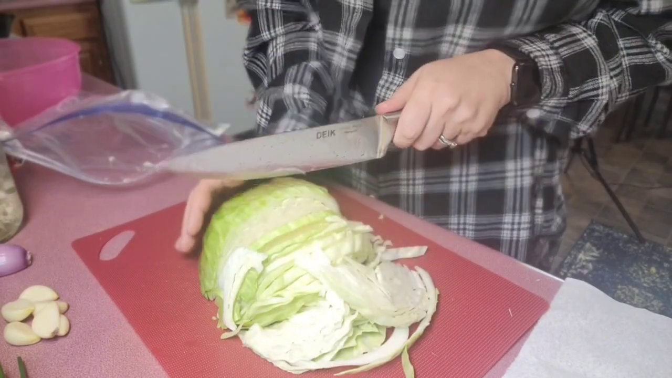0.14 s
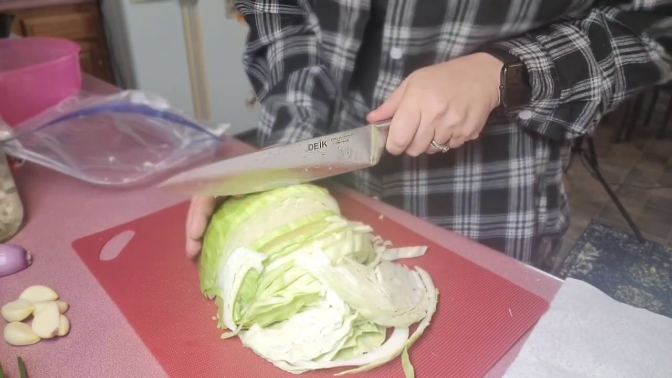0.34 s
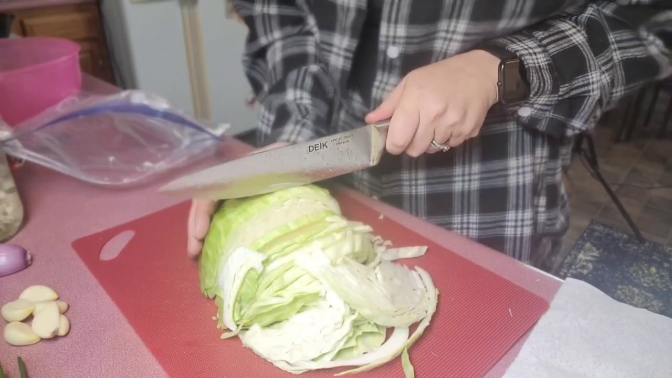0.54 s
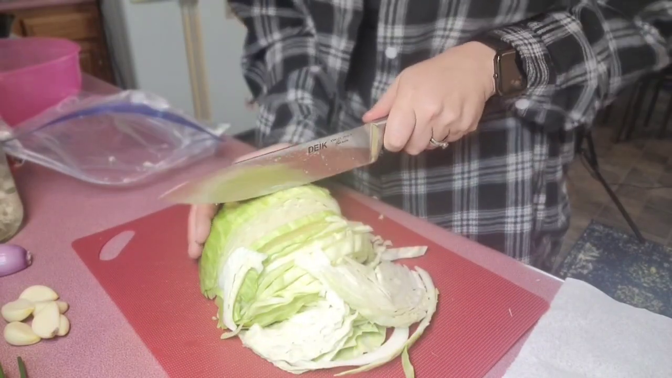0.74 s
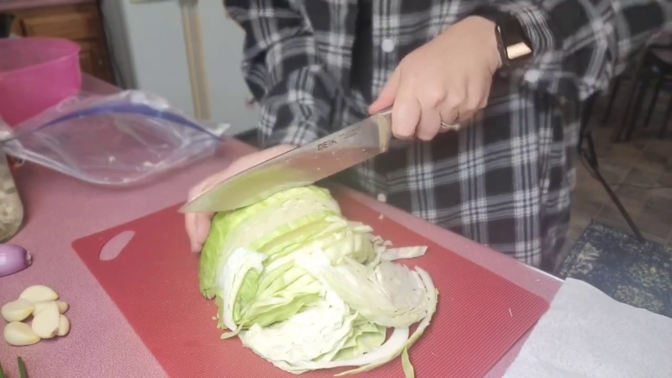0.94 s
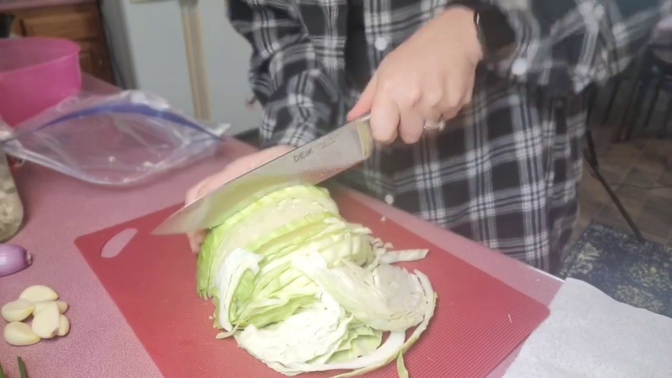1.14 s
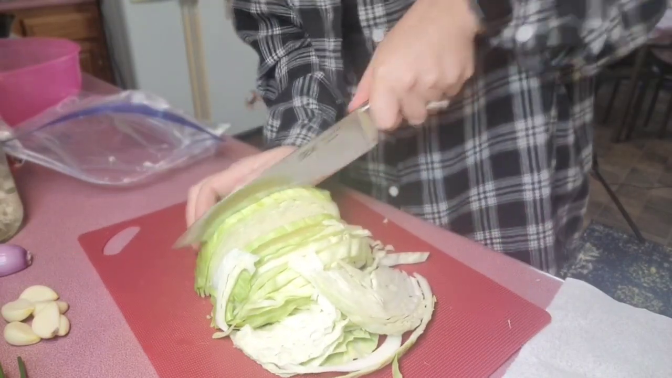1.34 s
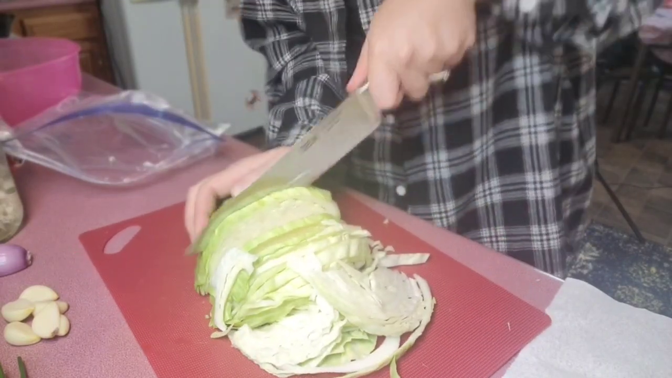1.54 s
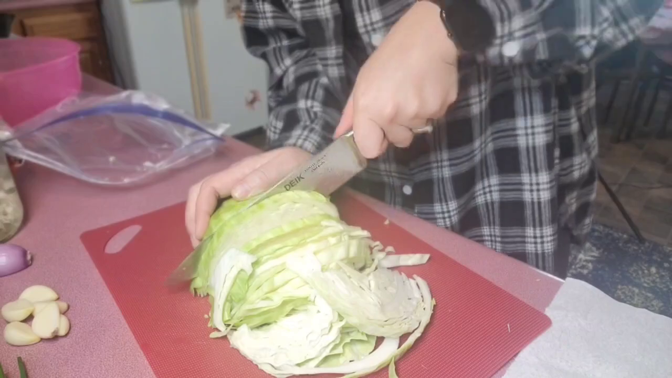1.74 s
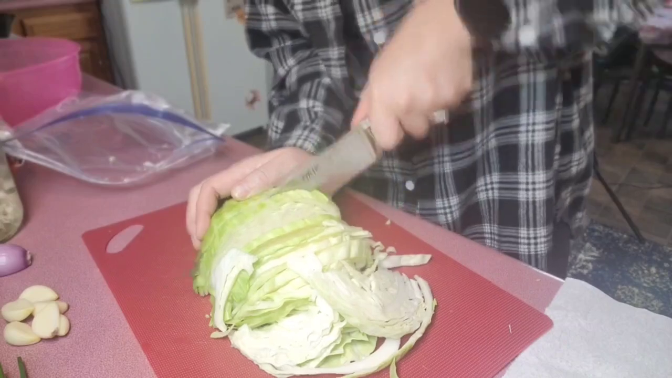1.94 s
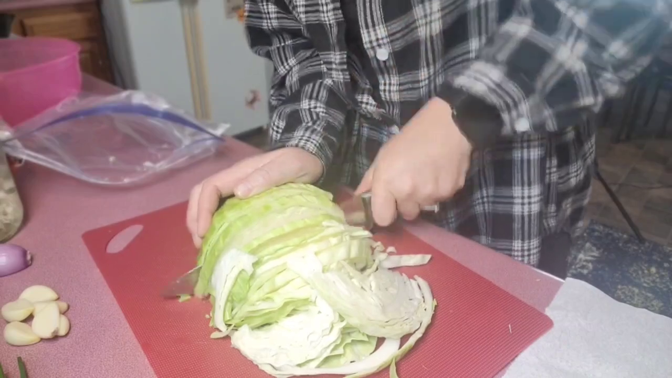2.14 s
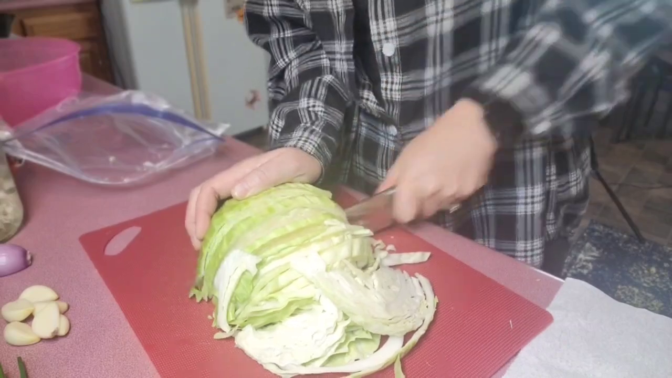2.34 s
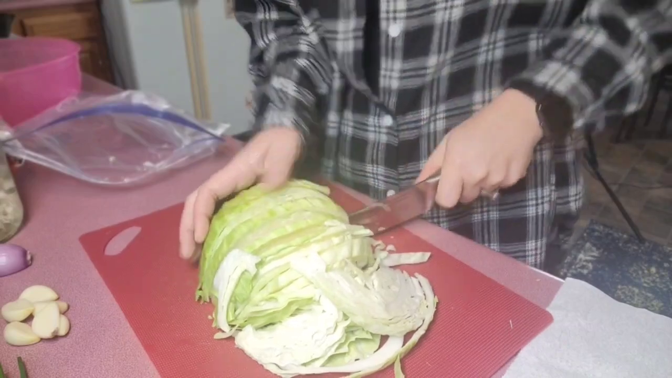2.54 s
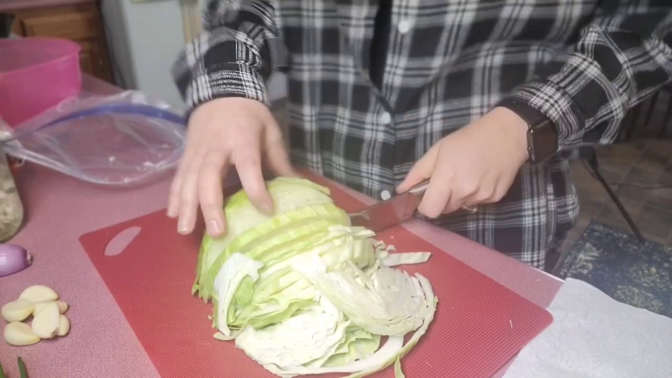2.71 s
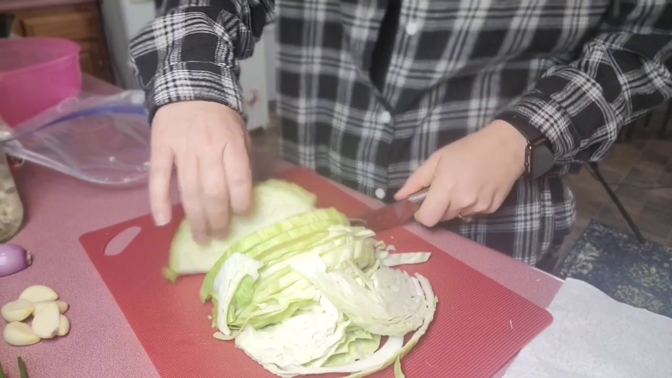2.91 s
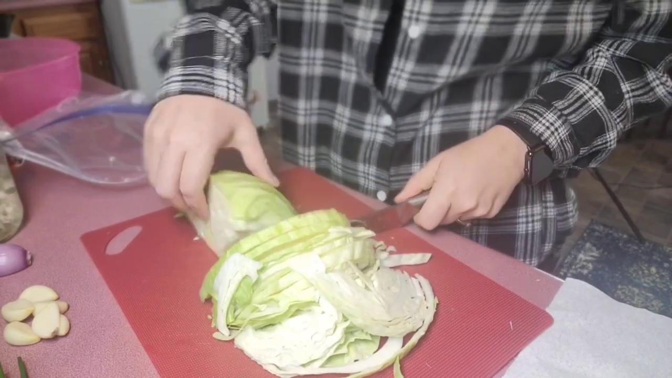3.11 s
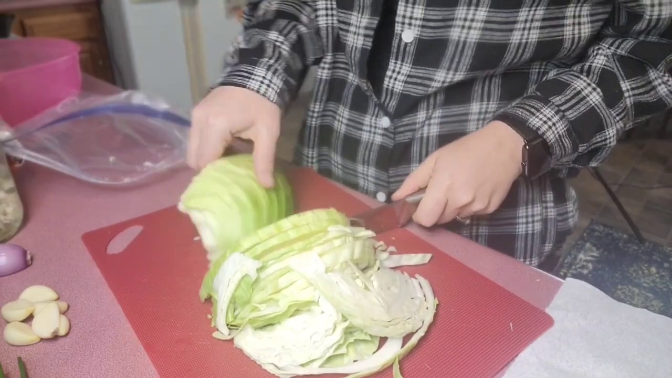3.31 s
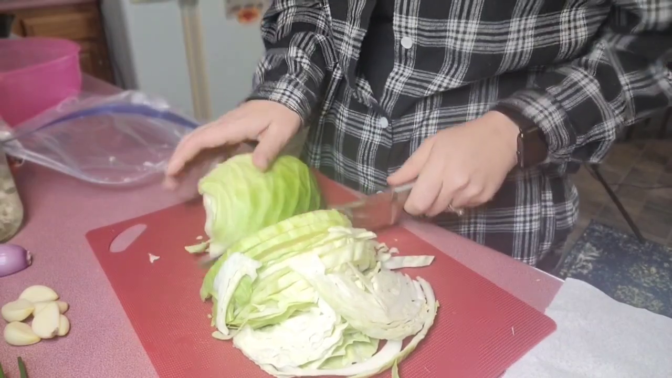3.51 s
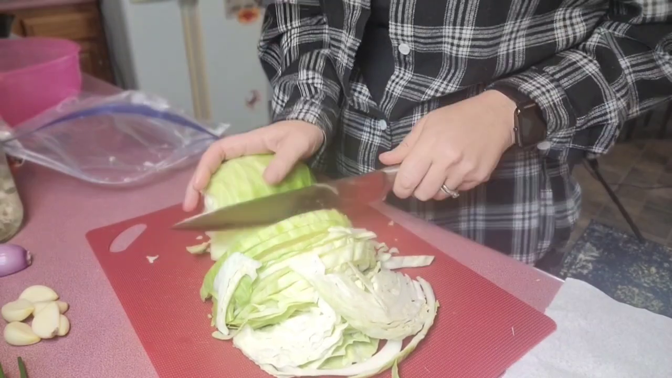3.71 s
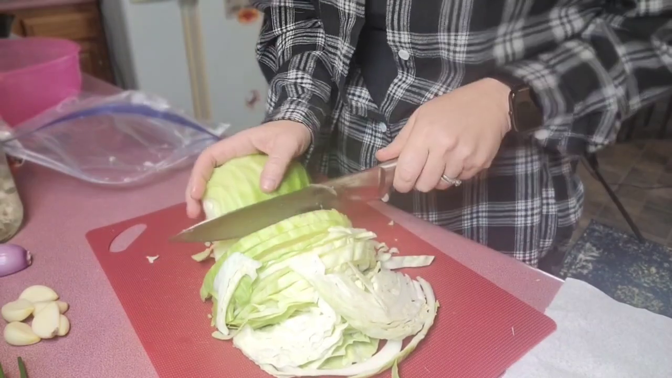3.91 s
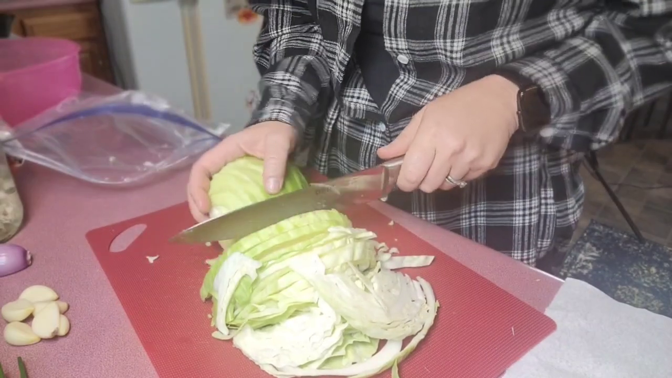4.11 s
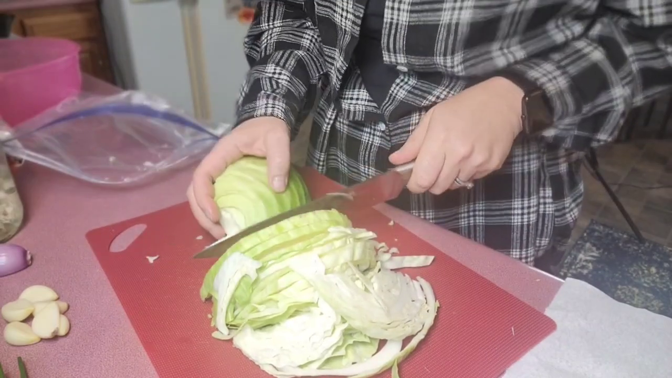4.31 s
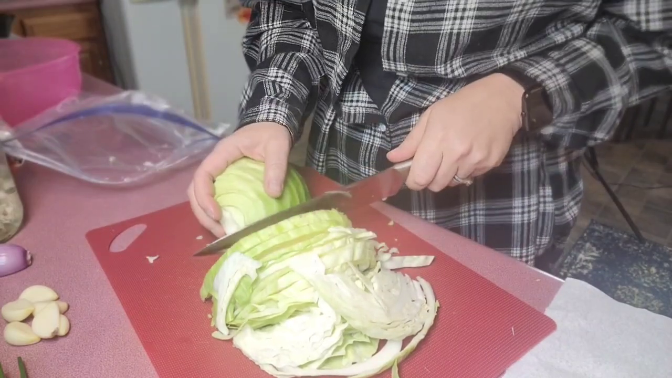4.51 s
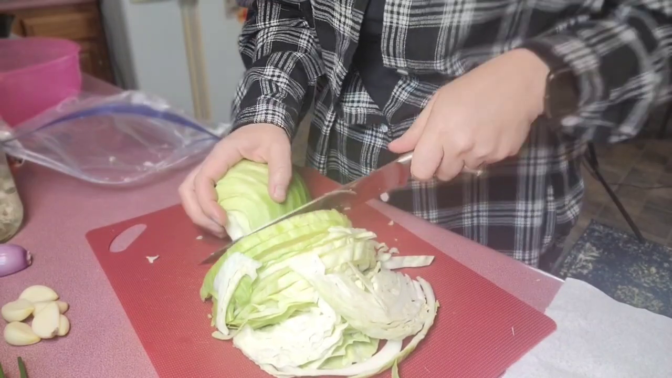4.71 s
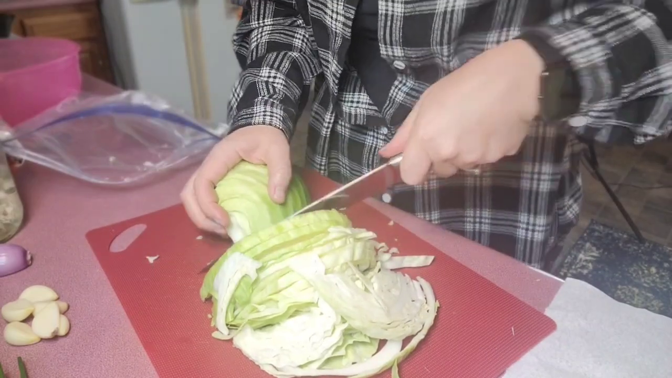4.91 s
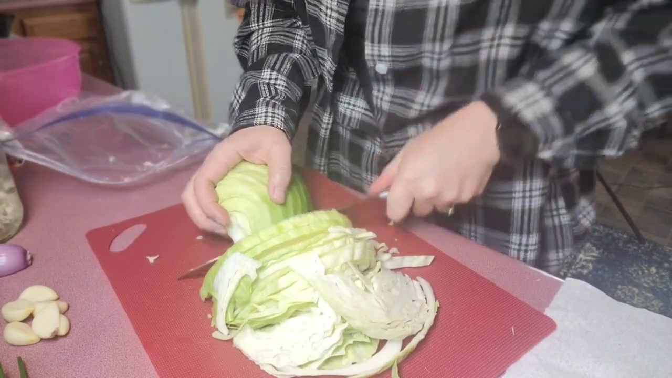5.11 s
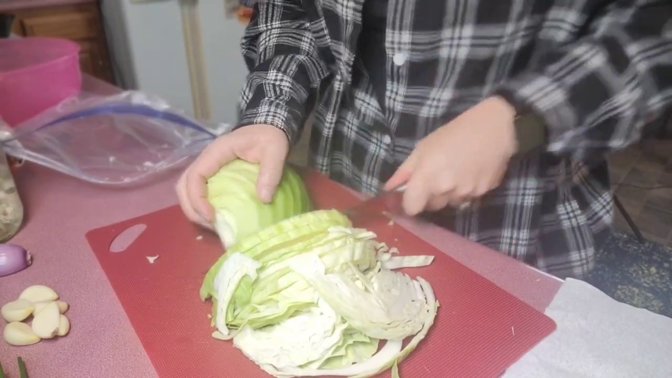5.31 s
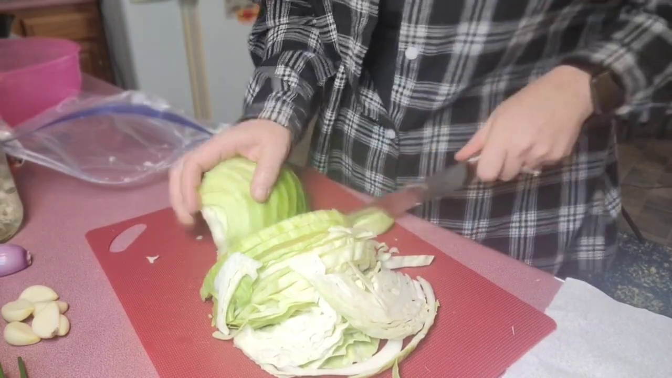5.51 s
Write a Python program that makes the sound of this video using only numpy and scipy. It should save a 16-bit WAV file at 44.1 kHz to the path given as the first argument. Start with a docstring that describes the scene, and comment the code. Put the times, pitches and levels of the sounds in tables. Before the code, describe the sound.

Cabbage being cut on a plastic board, heard very near, dry, slightly brighter on the right. Rhythmic wet crunches swell and pause, with rib snaps and tiny squeaks, until the blade hits the board hard. The head is then turned with soft papery crackle and thumps. After a near-silent gap comes one brief crisp cut, a duller knock, a short groan and a rising scrape.

```python
"""Kitchen counter: a chef's knife slices a cabbage on a plastic board in two cuts; a hand turns it between.
Crunch and rustle are random grains and wet pops shaped by effort curves; rib snaps and light blade touches
are noise bursts. Squeaks are jittered stick-slip tones; knocks and thumps ring the damped modes of board
and counter. Drags mix scrape with gliding chatter; the blade rings faintly.
Behind them: a short room tail, room noise and an appliance hum."""
import sys
import numpy as np
from scipy import signal
from scipy.fft import rfft, irfft
from scipy.io import wavfile
from scipy.ndimage import uniform_filter1d

SR = 44100
rng = np.random.default_rng(int(sys.argv[2]) if len(sys.argv) > 2 else 0)


def file_out(sig):
    """Save sig as 16-bit WAV at sys.argv[1]."""
    # one column per channel
    cols = np.atleast_2d(sig).T
    # limit, then scale
    lim = np.clip(cols, -1, 1)
    pcm = np.round(lim * 32767).astype(np.int16)
    wavfile.write(sys.argv[1], SR, pcm)


N = 244749
TIME = np.arange(N) / SR


def from_db(db):
    """Decibels to gain."""
    return 10 ** (np.asarray(db) / 20)


def rms_one(x):
    """Scale to unit rms."""
    return x / np.sqrt(np.mean(x ** 2) + 1e-20)


def at_hz(points, hz):
    """Read a table on a log-frequency axis."""
    table_hz, values = np.array(points).T
    return np.interp(np.log(hz + 1), np.log(table_hz), values)


def convolve(x, response):
    """Causal convolution along time."""
    return signal.fftconvolve(np.atleast_2d(x), np.atleast_2d(response), axes=-1)[:, :N]


def colour(x, spectrum, size=8192):
    """Minimum-phase filter of unit power with the given spectrum, falling away below its first point."""
    hz = np.arange(size // 2 + 1) * SR / size
    low_cut = np.minimum((hz + 1) / spectrum[0][0], 1) ** 2
    gain = from_db(at_hz(spectrum, hz)) * low_cut
    cepstrum = irfft(np.log(gain))
    response = irfft(np.exp(rfft(2 * cepstrum[:size // 2], size)))
    return convolve(x, response / np.linalg.norm(response))


def butter(x, hz, kind, order=2):
    """Butterworth low-, high- or band-pass."""
    return signal.sosfilt(signal.butter(order, hz, kind, fs=SR, output="sos"), x + 1e-18)


def drift(rate_hz):
    """Slow chance: straight lines between normal random knots."""
    knots = rng.standard_normal(N // 8)
    return np.interp(TIME * rate_hz, np.arange(len(knots)), knots)


def pulse(start_s, length_s):
    """A smooth contact force of unit area."""
    force = np.sin(np.pi * np.clip((TIME - start_s) / length_s, 0, 1)) ** 2
    return force / force.sum()


def ring(force, modes, struck=False):
    """Damped modes driven by a force: alternating-sign cosines, or sines in step if struck directly."""
    t = TIME[:SR // 2]
    swing = np.sin if struck else np.cos
    response = 0
    for k, (hz, db, t60_s) in enumerate(modes):
        sign = 1 if struck else (-1) ** k
        response = response + sign * from_db(db - 60 * t / t60_s) * swing(2 * np.pi * hz * t)
    return convolve(force, response)


def grains(per_s, spread_db):
    """Tiny fractures or slips at random moments and of uneven size; rms 1."""
    born = rng.random(N) < per_s / SR
    size = from_db(spread_db * np.minimum(rng.exponential(1, N), 4))
    clicks = born * size * rng.choice([-1, 1], N)
    local_power = uniform_filter1d(clicks ** 2, SR // 30)
    return rms_one(clicks / np.sqrt(local_power + 1e-3))


def bursts(events, decay_s):
    """Brittle breaks: each a crackle that dies at once, with the energy of one click."""
    t, out = TIME[:SR // 20], np.zeros(N + SR)
    for start_s, db in events:
        burst = rng.standard_normal(len(t)) * np.exp(-t / decay_s)
        out[int(start_s * SR):][:len(t)] += from_db(db) * burst / np.linalg.norm(burst)
    return out[:N]


RIGHT_LOUDER_DB, LEFT_LAG_S = 3.6, .00018   # treble lead of the right; delay of the left


def ports(x, scatter_db, scatter_s, lag_s=LEFT_LAG_S, split_hz=1000):
    """Two microphone ports: the left hears later; nearby surfaces scatter the treble differently into each."""
    t = TIME[:SR // 40]
    echoes = rng.standard_normal((2, len(t))) * np.exp(-t / scatter_s)
    echoes *= from_db(scatter_db) / np.linalg.norm(echoes, axis=1, keepdims=True)
    direct = 1.0 * (t == 0)
    bass = butter(direct, split_hz, "low", order=1)
    treble = direct - bass + butter(echoes, split_hz, "high")
    treble /= np.sqrt(1 + from_db(2 * scatter_db))
    balance = from_db([[-RIGHT_LOUDER_DB / 2], [RIGHT_LOUDER_DB / 2]])
    left, right = convolve(x, bass + treble * balance)
    return np.array([np.pad(left, round(lag_s * SR))[:N], right])


def patchy(x, depth_db, rate_hz):
    """Leaves of different stiffness give way in turn, so each half-octave swells on its own."""
    edges_hz = np.geomspace(1000, 11000, 8)
    band = np.digitize(np.arange(N // 2 + 1) * SR / N, edges_hz)
    spectrum, out = rfft(x), 0
    for k in range(len(edges_hz) + 1):
        out = out + irfft(spectrum * (band == k), N) * rms_one(from_db(depth_db * drift(rate_hz)))
    return out


def pops(cycles=12.0, spread_db=3.5):
    """Juicy cells burst one by one, each dying 60 dB in a few cycles at a pitch of its own; rms 1."""
    at, pitch, chance = rng.random((3, 2000 * N // SR, 1))
    t, hz = TIME[:SR // 150], 700 + 14500 * pitch
    level_db = -spread_db * np.log(chance + .02) - 60 * t * hz / cycles
    waves = np.sqrt(hz) * from_db(level_db) * np.sin(2 * np.pi * hz * t)
    where = (at * N).astype(int) + np.arange(len(t))
    return rms_one(np.bincount(where.ravel(), waves.ravel(), N)[:N])


def crackle(loudness, spectrum, per_s, spread_db, clump_db, wet=0, count=4):
    """Dry grains from several spots that take turns, each with its own path to the ports, and wet pops."""
    shares = from_db([10 * drift(rate_hz=14) for _ in range(count)])
    clumps = rms_one(from_db(clump_db * drift(rate_hz=180)))
    shares *= loudness * clumps / np.linalg.norm(shares, axis=0)
    out = sum(ports(share * grains(per_s, spread_db), scatter_db=5, scatter_s=.0028) for share in shares)
    if wet:   # power share of the pops
        juice = ports(loudness * pops(), scatter_db=-2, scatter_s=.003)
        out = np.sqrt(1 - wet) * out + np.sqrt(wet) * juice
    return colour(out, spectrum)


def gesture(start_s, rise_s, length_s, db, fade_db, release_s):
    """Gain of one movement: it builds up, fades or swells evenly while it lasts, then dies away."""
    t = TIME - start_s
    attack = np.sin(np.pi / 2 * np.clip(t / rise_s, 0, 1)) ** 2
    progress = np.clip((t - rise_s) / max(length_s - rise_s, 1e-3), 0, 1)
    release = np.exp(-np.maximum(t - length_s, 0) / release_s)
    return attack * from_db(db - fade_db * progress) * release + 1e-12


# room noise: (frequency [Hz], relative density [dB per Hz])
ROOM_NOISE_SPECTRUM = [(25, -14), (60, 1), (130, -20.5), (200, -10.5), (300, -21), (520, -23), (1340, -38),
                       (2500, -44.5), (6000, -47), (9500, -55), (15500, -57.5)]
# appliance hum: (frequency [Hz], rms level [dB])
HUM_TONES = [(59.2, -72), (118.4, -74.5), (193.8, -71.5), (349.9, -83), (457.6, -75)]
ROOM_NOISE_DB = -61.5


def background(apart_hz=700):
    """Room noise, more alike at both ports in the bass, and a slightly wavering appliance hum."""
    mid, side = colour(rng.standard_normal((2, N)), ROOM_NOISE_SPECTRUM)
    side = butter(side, apart_hz, "high") + from_db(-7.0) * side
    hum = 0
    for hz, db in HUM_TONES:
        phase = 2 * np.pi * hz * TIME + 0.28 * drift(rate_hz=1.7)
        hum = hum + from_db(db + 0.5 * drift(rate_hz=2.5)) * np.sqrt(2) * np.sin(phase)
    return from_db(ROOM_NOISE_DB) * (mid + side * np.array([[1], [-1]])) + hum


# kitchen reverberation: (frequency [Hz], t60 [s])
REVERB_T60 = [(100, 0.22), (700, .33), (4000, 0.17), (14000, 0.25)]


def kitchen(x):
    """A diffuse tail for each side, dying at its own rate in each band."""
    t, tail = TIME[:SR // 2], 0
    edges_hz = np.geomspace(60, 16000, 9)
    for low_hz, high_hz in zip(edges_hz, edges_hz[1:]):
        noise = butter(rng.standard_normal((2, len(t))), [low_hz, high_hz], "band")
        t60_s = at_hz(REVERB_T60, np.sqrt(low_hz * high_hz))
        tail = tail + noise * from_db(-60 * t / t60_s)
    tail = tail * np.clip((t - .004) / 0.00063, 0, 1)   # starts after 4 ms
    return convolve(x, tail / np.linalg.norm(tail, axis=1, keepdims=True))


# blade in the leaves: (start [s], length [s])
CUT_SPANS = [(0.914, 1.48), (4.91, 0.7)]
RUB_EDGE_S = 0.016   # coming and going


def in_cabbage():
    """About one while the blade is between the leaves, falling to zero outside."""
    return sum(gesture(start_s, RUB_EDGE_S, length_s, 0, 0, RUB_EDGE_S) for start_s, length_s in CUT_SPANS)


# hand steadies, turns and regrips the cabbage:
# (start [s], length [s], relative rustle level [dB], fade over the move [dB])
HAND_MOVEMENTS = [(2.565, 0.14, -62, -2.5), (2.77, 0.18, -63, 12), (2.947, 0.11, -58.5, -9.5),
                  (3.108, 0.39, -56, 1), (3.694, 0.154, -74.5, -4.5), (4.089, 0.17, -72.5, -9.5),
                  (4.717, 0.13, -72, 0.5)]
HAND_RISE_S, HAND_RELEASE_S = 0.037, 0.035


def hand_effort():
    """How hard the fingers bend the leaves."""
    return sum(gesture(start_s, HAND_RISE_S, length_s, db, fade_db, HAND_RELEASE_S)
               for start_s, length_s, db, fade_db in HAND_MOVEMENTS)


# hard pushes and lighter pulls of the blade in the leaves:
# (start [s], rise [s], length [s], relative crunch level [dB], fade over the stroke [dB],
#  relative counter rumble level [dB], relative first rib snap level [dB])
BLADE_STROKES = [(0.876, 0.011, 0.1, -59.5, 9, -49.5, -35), (0.949, 0.012, 0.063, -51.5, 13, -48.5, -48),
                 (1.046, 0.04, 0.14, -39.5, 11, -36.5, -36), (1.21, 0.052, 0.13, -53.5, 19.5, -79, -38),
                 (1.393, 0.035, .12, -36.5, 12, -32, -19), (1.552, 0.018, 0.1, -55.5, 13.5, -54.5, -77),
                 (1.699, 0.059, 0.14, -41.5, 3.5, -36.5, -33), (1.867, 0.087, 0.09, -54.5, 4.5, -50, -32.5),
                 (2.029, 0.035, 0.13, -39.5, -2.5, -34.5, -37), (2.153, 0.024, 0.037, -31, 0.5, -42, -44.5),
                 (2.2, 0.0091, 0.13, -52.5, 11, -51, -41), (4.898, 0.078, 0.11, -52, 5.5, -54.5, -38.5),
                 (5.011, 0.019, 0.027, -29.5, 7.5, -31.5, -34), (5.057, 0.035, 0.18, -50.5, -7.5, -49, -44)]
STROKE_RELEASE_S = 0.0097
PRESS_DB, PRESS_S = -26, 0.0066   # creak around each onset, relative to the stroke
RUB_DB = -70.5   # faint rub between strokes


def cutting_effort():
    """How hard the blade works through the leaves: it presses, bites, and rubs on until the next stroke."""
    effort = from_db(RUB_DB) * in_cabbage()
    for start_s, rise_s, length_s, db, fade_db, _, _ in BLADE_STROKES:
        press = from_db(db + PRESS_DB) * np.exp(-np.abs(TIME - start_s) / PRESS_S)
        effort = effort + press + gesture(start_s, rise_s, length_s, db, fade_db, STROKE_RELEASE_S)
    return effort


# soft pushes through the cabbage: (time [s], relative level [dB], contact [s])
SOFT_THUMPS = [(0.594, -20, 0.011), (0.959, -28.5, 0.0079), (1.414, -11.5, 0.013), (1.515, -23, 0.006),
               (1.845, -26, 0.0031), (2.763, -28, 0.014), (3.061, -22, 0.013), (3.191, -24.5, 0.011),
               (3.214, -25, 0.011)]
# counter under the board: (frequency [Hz], relative level [dB], t60 [s])
COUNTER_MODES = [(56.35, -10.5, 0.072), (96, -5.5, 0.13), (166, -10.5, 0.046), (159, 5, 0.074),
                 (212.5, -3.5, 0.096)]
# counter shake: (frequency [Hz], relative density [dB per Hz])
RUMBLE_SPECTRUM = [(25, -13), (55, -6), (90, 7), (125, -6), (175, 2.5), (240, -18.5), (400, -20),
                   (900, -58.5)]
SHAKE_RELEASE_S = 0.038
SHAKE_FOLLOWS = 0.63   # share of a stroke's fade that the rumble follows
RUB_SHAKE_DB, HAND_SHAKE_DB = -59, 3.5   # rubbing blade; hand, over its effort


def counter():
    """The uneven force of blade and hand shakes the counter, and sudden give thumps it."""
    shake = colour(rng.standard_normal(N), RUMBLE_SPECTRUM)
    shake /= np.sqrt(uniform_filter1d(shake ** 2, SR // 16) + 1e-6)   # even out the level
    force = from_db(RUB_SHAKE_DB) * in_cabbage() + from_db(HAND_SHAKE_DB) * hand_effort()
    for start_s, rise_s, length_s, _, fade_db, db, _ in BLADE_STROKES:
        force = force + gesture(start_s, rise_s, length_s, db, SHAKE_FOLLOWS * fade_db, SHAKE_RELEASE_S)
    push = sum(from_db(db) * pulse(start_s, contact_s) for start_s, db, contact_s in SOFT_THUMPS)
    return from_db(-2.5) * force * shake + ring(push, COUNTER_MODES)


# bending leaves: (frequency [Hz], relative density [dB per Hz])
RUSTLE_SPECTRUM = [(250, -3.5), (900, 4), (1600, 1), (3400, 9), (4400, 3), (7800, 6), (9000, -7),
                   (15500, -10.5)]


def handling():
    """Leaves bending under the fingers give a thinner, coarser, more clumped crackle."""
    rustle = crackle(hand_effort(), RUSTLE_SPECTRUM, per_s=1100, spread_db=3.6, clump_db=2.2, wet=.3)
    return from_db(.5) * patchy(rustle, depth_db=1.5, rate_hz=70)


# fingertip jerks on a taut leaf: (time [s], relative peak level [dB])
FINGER_TICKS = [(3.5316, -36), (3.5806, -46), (3.5862, -40), (3.5898, -39.5), (3.6103, -46)]
TICK_HZ, TICK_S = 3430, 0.00037


def ticks():
    """Each jerk of the fingertip flicks the leaf for a few cycles."""
    out = np.zeros(N)
    for time_s, db in FINGER_TICKS:
        t = TIME - time_s
        out += from_db(db) * np.exp(-(t / TICK_S) ** 2) * np.cos(2 * np.pi * TICK_HZ * t)
    return out


# wet leaf on steel or skin, squeak to groan:
# (start [s], length [s], relative level [dB], frequency [Hz])
LEAF_SQUEAKS = [(1.099, 0.0085, -43.5, 910), (1.139, 0.0087, -45.5, 950), (1.509, 0.0066, -43, 4520),
                (1.519, 0.0031, -40, 4440), (1.564, 0.008, -52.5, 5150), (1.837, 0.0093, -43, 4510),
                (2.271, 0.0038, -36, 3030), (2.327, 0.0048, -41.5, 3280), (4.83, 0.011, -65, 4630),
                (4.923, 0.0047, -50.5, 4300), (5.206, 0.046, -32, 171.5)]
GROAN_TOP_HZ = 1200   # slow slips have overtones up to here


def squeaks():
    """Stick and slip in uneven cycles; slow slips are more regular and carry overtones."""
    out = np.zeros(N)
    for start_s, length_s, db, hz in LEAF_SQUEAKS:
        t = TIME[:int(length_s * SR)]
        jitter = np.interp(t * hz, np.arange(80), rng.standard_normal(80))
        rough = .19 if hz > 500 else .06
        phase = 2 * np.pi * np.cumsum(hz * (1 + rough * jitter)) / SR
        overtones = max(int(GROAN_TOP_HZ / hz), 1)
        wave = sum(np.sin(k * phase) / k ** 2 for k in range(1, overtones + 1))
        out[int(start_s * SR):][:len(t)] += from_db(db + 4.5) * np.sqrt(np.sin(np.pi * t / length_s)) * wave
    return out


# flat of the blade along the leaves: (start [s], length [s], relative level [dB])
BLADE_SLIDES = [(1.21, 0.042, -64), (2.581, 0.17, -64.5), (4.092, 0.21, -85)]
# steel blade modes, damped by hand and leaves: frequency [Hz]
BLADE_MODES_HZ = [1403, 1937, 2164, 3110, 3320, 4180, 4470, 5113, 5307, 7360]
BLADE_T60_S, BLADE_SINGS_DB = 0.071, -10   # decay; gain on the cutting effort


def steel():
    """Fibres catching on the blade make it ring faintly at its own steady pitches."""
    sliding = sum(gesture(start_s, RUB_EDGE_S, length_s, db, 0, RUB_EDGE_S)
                  for start_s, length_s, db in BLADE_SLIDES)
    modes = [(hz, 0, BLADE_T60_S) for hz in BLADE_MODES_HZ]
    singing = rms_one(ring(grains(per_s=4000, spread_db=2.0), modes))
    return (sliding + from_db(BLADE_SINGS_DB) * cutting_effort()) * singing


# blade lands on the board:
# (time [s], relative crack level [dB], relative board level [dB], relative counter level [dB], contact [s])
BOARD_KNOCKS = [(2.1788, 7, -8.5, -20, 0.00012), (5.0321, -1.5, -17, -30, 0.00094)]
# board with the blade on it: (frequency [Hz], relative level [dB], t60 [s])
BOARD_MODES = [(208, 1, 0.048), (310, -4.5, 0.052), (392.2, -0.5, .06), (587.4, -11, 0.045),
               (914, -9, 0.066), (1218, -11.5, 0.065), (1290, -12, 0.042), (2255, -14, 0.081),
               (3360, -11.5, 0.037), (3700, -13.5, 0.05), (4610, -18.5, 0.061)]
# edge on plastic; board on counter: (frequency [Hz], relative density [dB per Hz])
CRACK_SPECTRUM = [(250, -6), (900, 1.5), (1700, -10), (2500, 0), (3600, 3.5), (5000, -3.5), (7200, 0.5),
                  (9500, -12.5), (15500, -25.5)]
SLAP_SPECTRUM = [(450, -4.5), (620, -0.5), (1000, -2), (1500, -7.5), (4000, -23.5)]


def knocks():
    """The edge cracks on the plastic, the board slaps on the counter, and both ring; long contact is duller."""
    cracks = [(time_s, db) for time_s, db, _, _, _ in BOARD_KNOCKS]
    slaps = [(time_s, db) for time_s, _, db, _, _ in BOARD_KNOCKS]
    crack = from_db(1.0) * colour(bursts(cracks, decay_s=0.0016), CRACK_SPECTRUM)
    slap = from_db(12.0) * colour(bursts(slaps, decay_s=0.007), SLAP_SPECTRUM)
    board_force, counter_force = 0, 0
    for time_s, _, board_db, counter_db, contact_s in BOARD_KNOCKS:
        board_force = board_force + from_db(board_db) * pulse(time_s + 0.0015, contact_s)
        counter_force = counter_force + from_db(counter_db) * pulse(time_s, 0.0022)
    board = butter(ring(board_force, BOARD_MODES, struck=True), 130, "high")
    return crack + slap + board + ring(counter_force, COUNTER_MODES)


# edge or turning cabbage drawn over the board: (start [s], rise [s], length [s], relative scrape level [dB],
#  chatter over the scrape [dB], chatter frequency [Hz], glide [Hz/s])
BOARD_DRAGS = [(2.222, .012, 0.033, -51, -5, 640, -6), (2.384, 0.037, 0.12, -49, -8, 746, -350),
               (3.335, 0.033, 0.13, -58, -13.5, 891, -9), (5.322, 0.075, 0.16, -49.5, 0, 718.4, 455)]
# scrape: (frequency [Hz], relative density [dB per Hz])
DRAG_SPECTRUM = [(250, -6), (560, -16), (730, 6.5), (1200, -2.5), (1500, -11), (1850, -2.5), (2500, -4),
                 (3400, -4), (7500, -13.5), (9500, -27)]
DRAG_SWELL_DB, DRAG_RELEASE_S = 3.5, 0.037   # presses harder as it goes


def drag(wander=0.03, width_hz=75):
    """The edge catches and slips on the board's grain at a gliding, unsteady rate; the board sings along."""
    drawn, chatter = 0, 0
    for start_s, rise_s, length_s, db, chatter_db, hz, glide_hz_per_s in BOARD_DRAGS:
        force = gesture(start_s, rise_s, length_s, db, -DRAG_SWELL_DB, DRAG_RELEASE_S)
        pitch_hz = hz + glide_hz_per_s * np.clip(TIME - start_s, 0, length_s)
        pitch_hz = pitch_hz * (1 + wander * drift(rate_hz=50))
        grip = butter(rng.standard_normal(N), width_hz, "low")
        tone = rms_one(grip * np.sin(2 * np.pi * np.cumsum(pitch_hz) / SR))
        drawn = drawn + force
        chatter = chatter + from_db(chatter_db) * force * tone
    scrape = from_db(0.5) * crackle(drawn, DRAG_SPECTRUM, per_s=3500, spread_db=3.5, clump_db=3.0)
    # after the last knock the cutting blade drives the board too
    on_board = TIME > BOARD_KNOCKS[-1][0]
    riding = from_db(-12) * drawn + from_db(-1.5) * cutting_effort() * on_board
    catches = butter(grains(per_s=1000, spread_db=1.0), [380, 1100], "band")
    board = from_db(7.0) * chatter + riding * rms_one(ring(catches, BOARD_MODES))
    return scrape + ports(board, scatter_db=-5, scatter_s=.004, lag_s=.0005)


# short crisp clicks, ribs snapping and light touches of the blade: (time [s], relative level [dB])
CRISP_CLICKS = [(0.347, -43), (0.597, -43.5), (2.015, -33.5), (2.179, 3), (2.288, -24), (2.339, -25),
                (2.978, -36.5), (3.198, -26.5), (3.466, -27.5), (4.203, -46), (4.236, -35), (4.29, -38),
                (4.768, -41.5), (4.940, -23), (4.952, -23)]
# bursting leaf: (frequency [Hz], relative density [dB per Hz])
CRUNCH_SPECTRUM = [(200, -4.5), (520, -8.5), (900, 0), (1400, -9.5), (2000, -0.5), (2500, -1.5),
                   (3500, -0.5), (5400, -3.5), (7500, -1.5), (9000, -13), (15500, -15)]
BITE_S = 0.018   # stroke start to its first snap


def snaps():
    """Short crisp clicks: a rib snapping as each stroke bites, more ribs, and light touches of the blade."""
    bites = [(start_s + BITE_S, db) for start_s, *_, db in BLADE_STROKES]
    clicks = colour(bursts(bites + CRISP_CLICKS, decay_s=0.0005), CRUNCH_SPECTRUM)
    return from_db(1.5) * butter(clicks, 1500, "high")


def slicing(sink_s=0.025, crisp_hz=7000, crisp=1.4):
    """Cells burst along the edge; a fresh push is crisp, then the leaves close round the blade and dull it."""
    cutting = cutting_effort()
    crunch = crackle(cutting, CRUNCH_SPECTRUM, per_s=4000, spread_db=3.3, clump_db=1.3, wet=.3)
    keep = np.exp(-1 / (sink_s * SR))
    recent = signal.lfilter([1 - keep], [1, -keep], cutting)
    fresh = cutting / (cutting + recent)   # 0.5 when steady
    top = butter(crunch, crisp_hz, "high", order=1)
    return from_db(-1.08) * (crunch + crisp * (fresh - .5) * top)


def scene():
    """Cabbage and board close to the microphone, in a small kitchen."""
    cabbage = patchy(slicing(), depth_db=2.0, rate_hz=80) + handling() + drag()
    cabbage += ports(snaps() + squeaks(), scatter_db=-3, scatter_s=.003)
    cabbage += ports(from_db(2) * (steel() + ticks()), scatter_db=-12, scatter_s=.003)
    blows = ports(knocks(), scatter_db=-6, scatter_s=.005, lag_s=.0003)
    shaking = ports(counter(), scatter_db=-1, scatter_s=.005)
    room = kitchen(from_db(-12.5) * cabbage + from_db(-14.5) * butter(blows, [330, 2500], "band"))
    return cabbage + blows + shaking + room + background()


CUTOFF_HZ = 15900


def record(dry):
    """Peaks are rounded and the top is cut."""
    rounded = .95 * np.tanh(dry / .95)
    return signal.sosfilt(signal.ellip(10, .1, 80, CUTOFF_HZ, fs=SR, output="sos"), rounded)


dry = scene()
out = record(dry)
file_out(out)
```